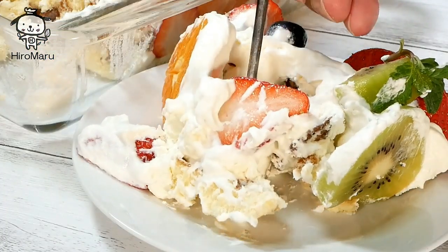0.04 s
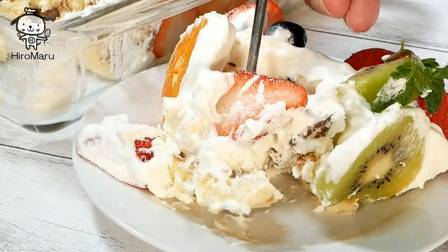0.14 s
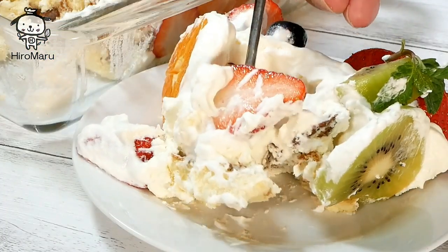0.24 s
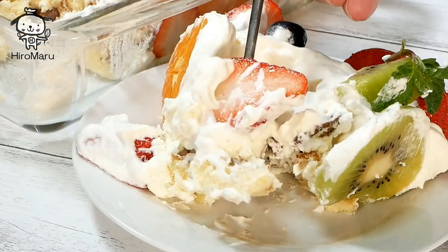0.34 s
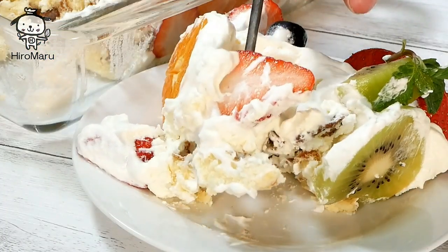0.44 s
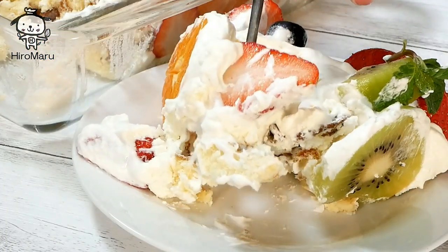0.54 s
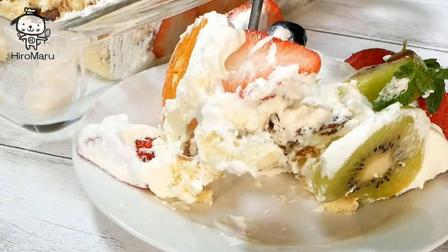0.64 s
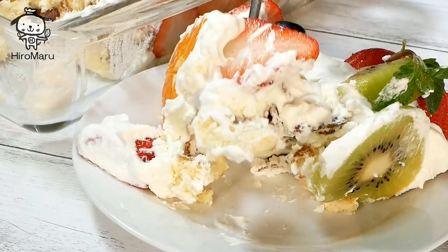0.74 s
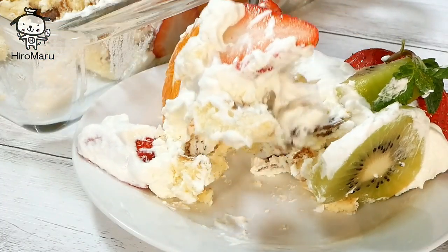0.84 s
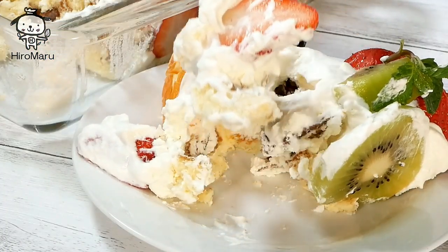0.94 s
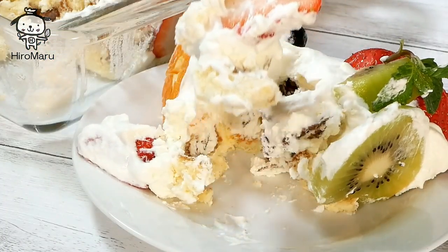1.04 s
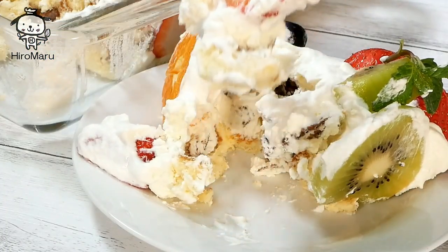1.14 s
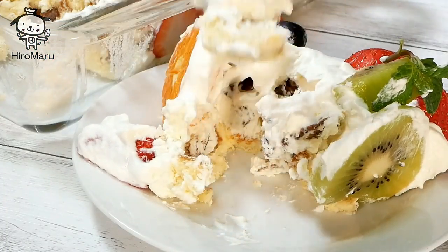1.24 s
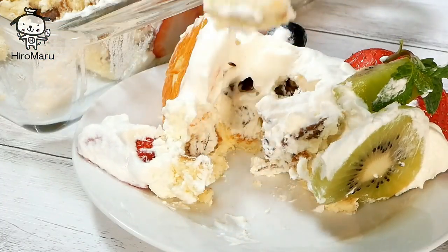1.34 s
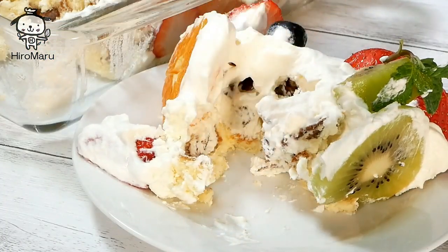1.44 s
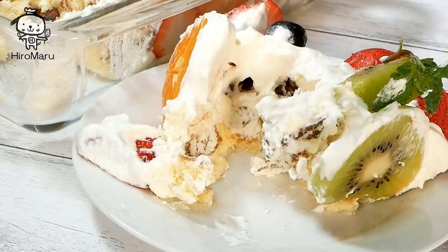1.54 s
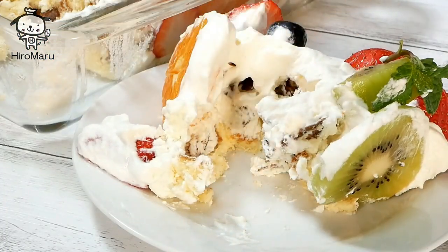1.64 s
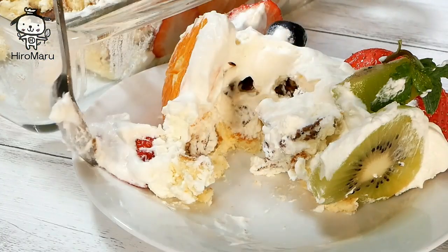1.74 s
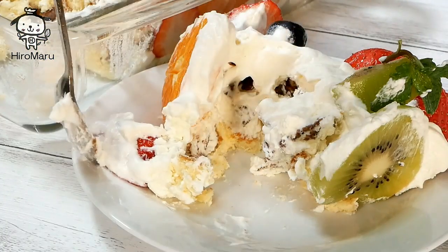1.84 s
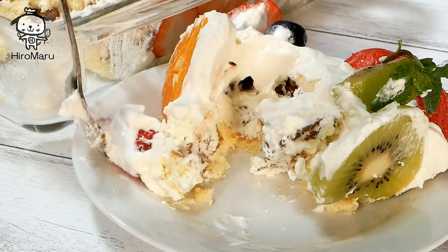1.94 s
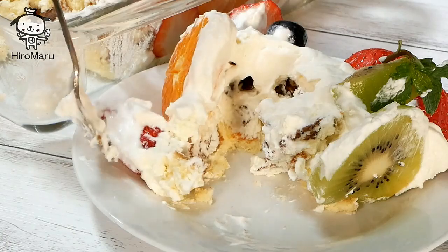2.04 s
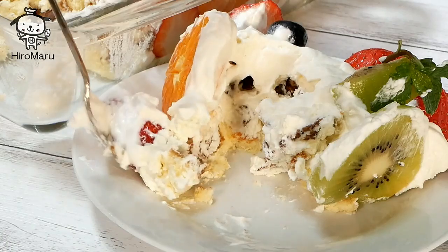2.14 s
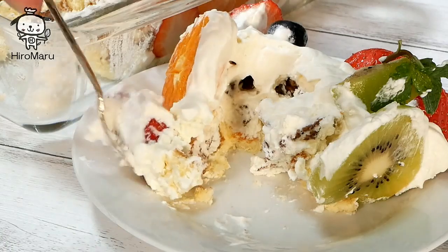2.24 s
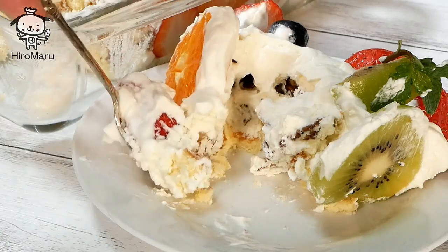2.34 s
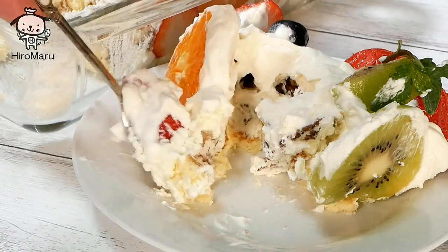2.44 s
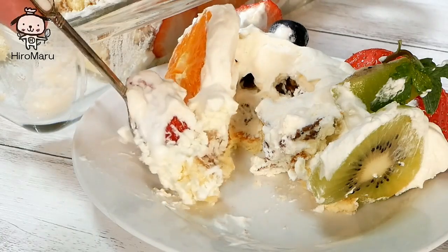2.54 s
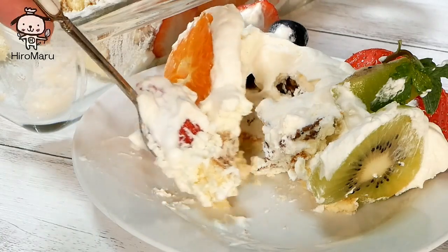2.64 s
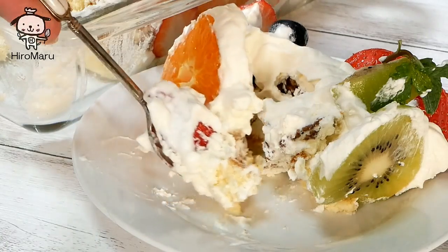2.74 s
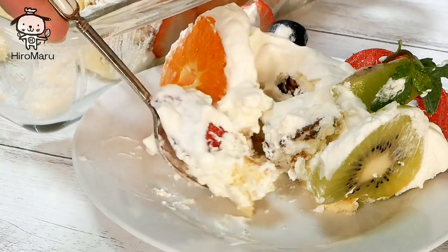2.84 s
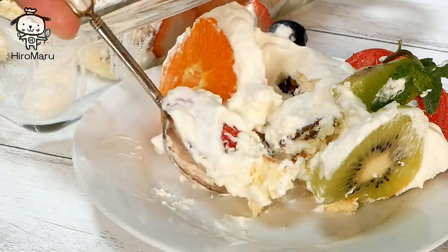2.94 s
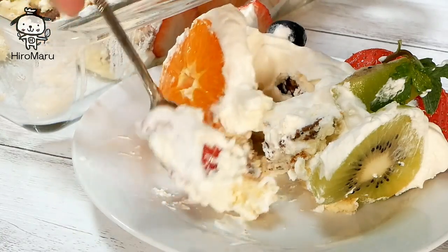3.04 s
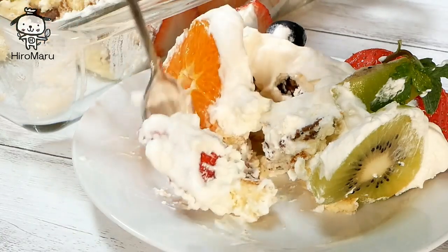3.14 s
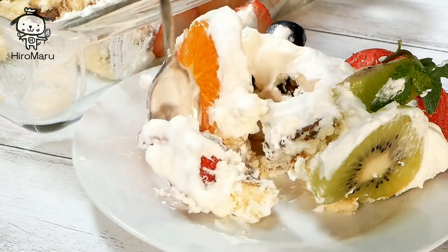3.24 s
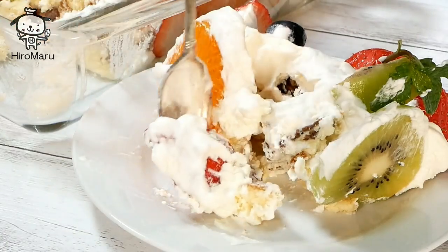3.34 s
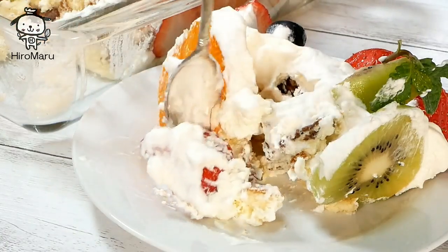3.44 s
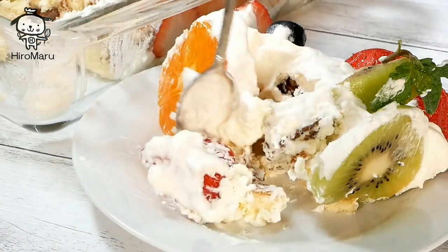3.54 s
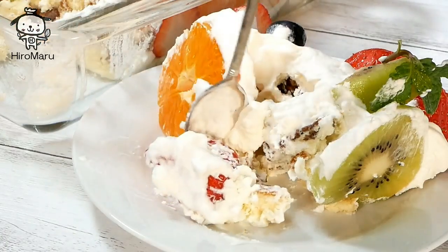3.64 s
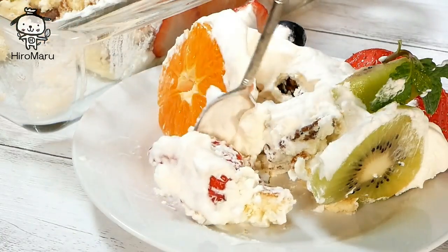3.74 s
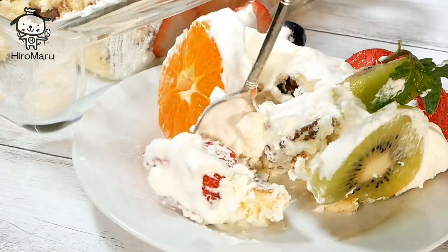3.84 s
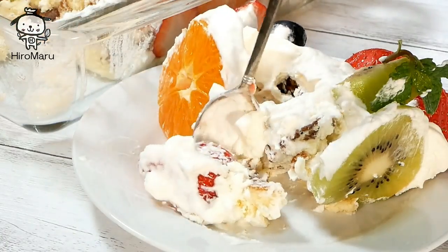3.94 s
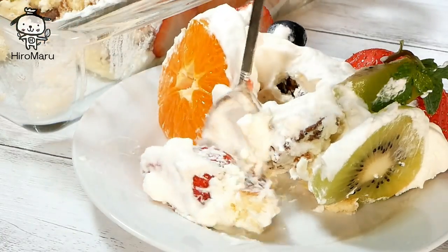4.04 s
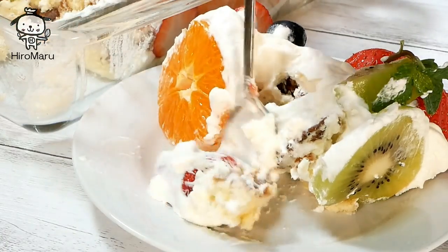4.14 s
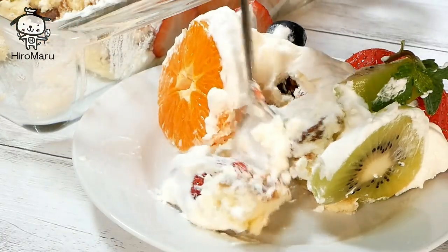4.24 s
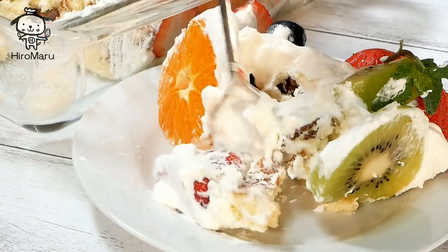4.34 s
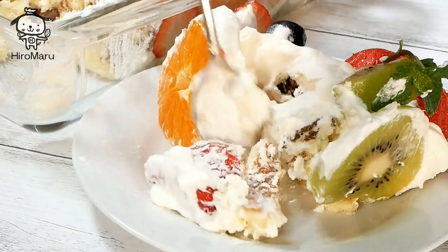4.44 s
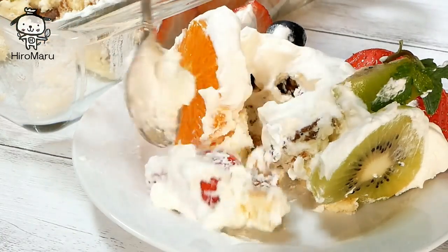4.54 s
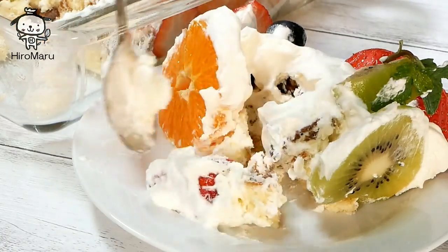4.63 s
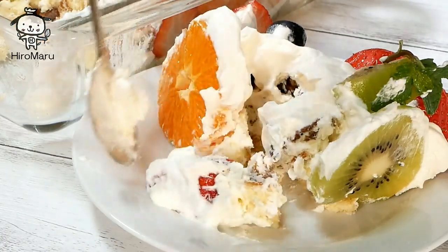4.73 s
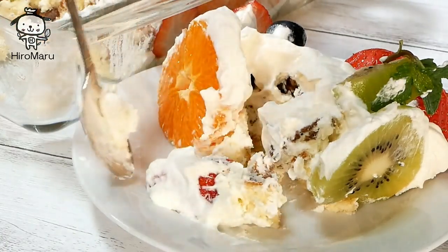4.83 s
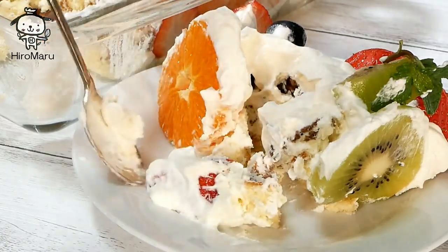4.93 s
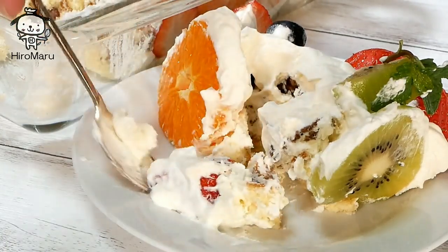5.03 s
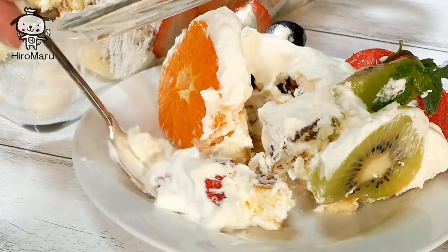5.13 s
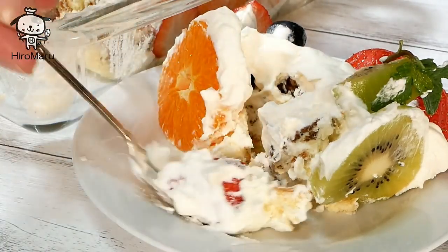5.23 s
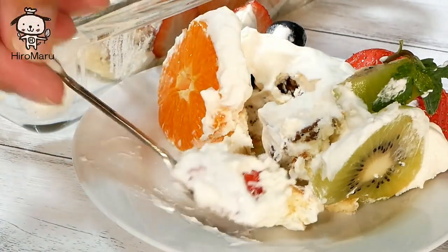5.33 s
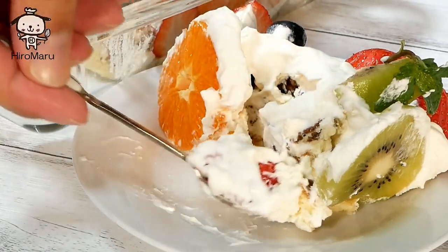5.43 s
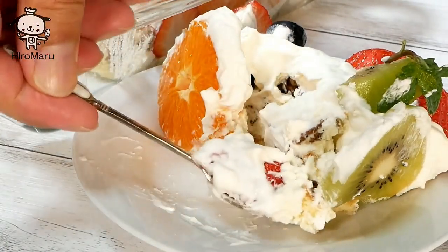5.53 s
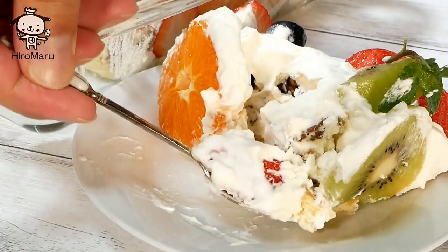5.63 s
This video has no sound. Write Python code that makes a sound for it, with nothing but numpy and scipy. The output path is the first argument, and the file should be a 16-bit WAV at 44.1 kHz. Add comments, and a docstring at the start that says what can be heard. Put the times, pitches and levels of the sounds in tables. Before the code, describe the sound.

Close view of a spoon working through soft cream cake on a ceramic plate. Faint wet ticks first, then a bright clink and short scrape near two seconds, more damped clinks and rubs, a firm tap near four seconds with a brief squeak, and two final clinks and scrapes after five. Quiet small kitchen, near microphone, low room noise and slight hiss.

```python
"""Faint wet ticks of cream come first, over a quiet kitchen; then a steel spoon clinks on the plate.
Clinks are short dying modes of a ceramic plate damped by cream cake, with a crack and a table knock.
Scrapes and rubs are random slips driving modes of spoon and plate; a brief squeak is a locked tone.
Cream is noise ticks over a fine crackle. Scatter and a short room tail answer every contact,
and low room noise with a few narrow bands, and hiss, lie beneath."""
import sys
import numpy as np
from scipy import signal
from scipy.fft import rfft, irfft
from scipy.io import wavfile
from scipy.ndimage import uniform_filter1d

SR = 44100
rng = np.random.default_rng(int(sys.argv[2]) if len(sys.argv) > 2 else 0)


def wrap_up_sound(samples):
    """Save the sound to the file named by the first command line argument, as 16-bit audio."""
    columns = np.atleast_2d(samples).T
    # keep every value between -1 and 1, then stretch to whole-number steps
    tamed = np.clip(columns, -1, 1)
    steps = np.round(tamed * 32767).astype(np.int16)
    wavfile.write(sys.argv[1], SR, steps)


N = 250488  # samples in the scene

# Where the spoon meets the plate: names in the order of the level columns below
CONTACT_SPOTS = ("rim", "side", "centre", "front")
# Modes of the loaded plate with the spoon on it, before force and dullness:
# f/Hz, t60/s, level at rim/dB, at side/dB, at centre/dB, at front/dB
PLATE_MODES = [(329, 0.016, -6.5, -10, -9, -10), (592, 0.01, -12.5, -21.5, -6, -22.5),
               (910, 0.027, -14, -27, -13.5, -22.5), (1080, 0.017, -12, -13.5, -18.5, -13.5),
               (1235, 0.013, -12, -22.5, -6, -15.5), (1900, 0.0073, -19.5, -36, -15, -51),
               (2330, 0.013, -19.5, -28, -25, -22.5), (2627, 0.034, -35, -33, -24.5, -23),
               (2810, 0.021, -24, -33, -31, -33.5), (3044, 0.0081, -16, -45, -17, -46),
               (3699, 0.015, -37, -46, -9.5, -44), (4078, 0.03, -17, -28.5, -27, -26.5),
               (4323, 0.023, -15.5, -18, -31.5, -20.5), (4467, 0.032, -18, -19, -33.5, -21),
               (4784, 0.0098, -12.5, -15.5, -30, -16.5), (5700, 0.011, -19.5, -38, -13.5, -43),
               (6100, 0.041, -15.5, -35, -19.5, -27), (6297, 0.018, -23, -26.5, -16.5, -30),
               (6790, 0.011, -16, -23.5, -43, -21.5), (7360, 0.011, -42.5, -28, -22.5, -17.5),
               (7550, 0.0073, -18, -23.5, -23.5, -19), (8050, 0.067, -24, -57, -32.5, -20),
               (8440, 0.018, -37.5, -38, -26.5, -62), (8850, 0.013, -27, -53, -23, -34),
               (10260, 0.011, -36, -41, -33.5, -40), (10910, 0.0076, -37.5, -39, -52.5, -27),
               (11680, 0.0096, -25, -30, -46.5, -63), (12310, 0.02, -38, -35, -42.5, -24.5),
               (12500, 0.023, -32.5, -41, -54.5, -34), (13517, 0.01, -38.5, -38, -35.5, -44)]
# Longer modes of the spoon and the plate's free edge, before each blow's own gains:
# f/Hz, t60/s, level at rim/dB, at side/dB, at centre/dB, at front/dB
LONG_RING_MODES = [(1311, 0.23, -52, -41.5, -48.5, -47), (2677, 0.11, -60.5, -35.5, -50.5, -37),
                   (2729, 0.13, -61.5, -38.5, -59.5, -30), (3740, 0.053, -71.5, -70, -35, -70),
                   (3530, .15, -72, -76, -44.5, -70), (4200, 0.26, -49, -59, -37.5, -47),
                   (4385, 0.18, -43.5, -57, -59, -35.5), (5980, 0.074, -38, -47, -33.5, -62),
                   (7600, 0.17, -42, -43, -53.5, -57), (8240, 0.18, -48.5, -39, -56.5, -47),
                   (12800, .12, -53.5, -41, -69, -52)]
# The wooden table under the plate, before force: f/Hz, t60/s, level/dB
TABLE_MODES = [(156.9, 0.24, -53.5), (208, 0.18, -48)]
# Blows: t/s, spot, force/dB, dullness/(dB per kHz), long ring gain/dB, crack level before force/dB
BLOWS = [ (1.801, "rim", -2, 0, -0.5, -20.5), (1.944, "rim", -25, 2, 2, -48),
         (1.963, "rim", -32.5, 0.5, 10, -22), (2.173, "side", -0.5, 0.5, 3, -29),
         (2.3230, "side", -10, 1.1, -0.5, -33.5), (2.522, "side", -27.5, 3, -16, -24),
         (2.754, "centre", -26.5, 12, -8, -47), (2.819, "centre", -31, 4, -8, -42),
         (3.054, "side", -34, -1, -10, -23), (3.7, "centre", -35.5, 3.5, -5.5, -37),
         (3.8400, "centre", -2.5, -0.5, -6.5, -33.5), (4.0269, "centre", -12, 9, -2, -37),
         (4.0485, "centre", -20.5, 4, 5, -37), (4.07, "centre", -12, 11, 1, -42),
         (4.924, "front", -2, 0, 5, -28), (5.1164, "front", -6, 1.66, 0.5, -33.5)]
# Tone of steel cracking on glaze: f/Hz, level/dB
CRACK_TONE = [(300, -4.5), (2000, 3), (6500, 2), (9000, -1.5), (12500, -2.5), (15500, -12)]
# Pushes along the glaze: t of greatest pressure/s, spot, rise/s, fall/s, level/dB,
# contact stiffness (factor on pitch, before each mode's share), cream crackle relative to the push/dB
PUSHES = [ (1.954, "rim", 0.066, 0.038, -56.5, 1.02, -11), (2.512, "side", 0.044, .04, -64, 0.88, -12),
          (2.655, "side", 0.1, 0.12, -66.5, 0.92, -6), (3.057, "side", 0.048, 0.041, -58, 0.9, -13),
          (4.110, "centre", 0.029, 0.02, -65.5, 0.79, -1), (4.231, "centre", .04, 0.022, -57.5, 0.83, 0.5),
          (4.293, "centre", .005, 0.027, -61.5, .76, -2.5),
          (4.316, "centre", 0.013, 0.0077, -58.5, 0.77, -3),
          (5.214, "front", 0.056, 0.034, -59.5, 1.03, -2), (5.305, "front", 0.098, 0.054, -55.5, 0.97, -10),
          (5.353, "front", .025, 0.029, -59, 1.1, -12)]
# Bending modes of the spoon pressed on the glaze: f/Hz, nominal width/Hz (doubled in each of two
# filter passes), level/dB, share (exponent) by which pitch follows the stiffness
PRESSED_MODES = [(1118, 84, 6, 0.21), (2554, 107, 2, 0.85), (4545, 173, 3.5, 0.3), (5980, 160, -7, 0.3),
                 (7160, 540, -8.5, 0.41), (7940, 120, -4, 0.087), (8930, 210, -7.5, 0.089),
                 (12200, 2000, -24, 0.18)]
# Stick-slip squeaks: t of firmest grip/s, rise/s, fall/s, level/dB, f at firmest grip/Hz, roughness 0-1
SQUEAK_GRIPS = [(4.139, .01, 0.026, -52.5, 1000, 0.4), (4.181, 0.023, 0.016, -47, 1037, 0.37),
                (4.222, .045, 0.024, -39.5, 969, 0), (4.292, .004, 0.038, -54, 1092, 0.9)]
# Wet ticks of cream parting, before a common size trim: t/s, level/dB
CREAM_TICKS = [(0.241, -45), (.353, -50), (.638, -49), (2.591, -41), (2.805, -47.5), (2.908, -44),
               (2.937, -47), (3.106, -40), (3.171, -45.5), (3.276, -51), (4.364, -41.5), (4.392, -45),
               (4.545, -49), (5.2216, -31.5), (5.509, -45.5), (5.624, -44)]
# Tone of ticks and crackle: f/Hz, level/dB
CREAM_TONE = [(300, -20.5), (1500, -11.5), (4000, -6.5), (6000, -3.5), (8300, 2), (10500, -7.5),
              (15500, -11)]
# The spoon sinks through cream and sponge: t of fastest cutting/s, rise/s, fall/s, level/dB
CAKE_CUTS = [(1.69, .22, 0.11, -74.5), (2.87, 0.76, 0.33, -71), (3.79, .25, .7, -68.5)]
# How long the room rings: f/Hz, t60/s
ROOM_DECAY = [(200, .38), (530, 0.36), (1390, 0.29), (3680, 0.26), (9700, 0.2), (16000, 0.088)]
# Tone of the room tail: f/Hz, level/dB
ROOM_TONE = [(150, 5.5), (330, -4), (650, 0.5), (1100, -6.5), (2500, 0.5), (4500, -4.5), (8000, -7),
             (14000, -0.5)]
# Spectral shape of still room and microphone hiss: f/Hz, relative level/(dB per Hz)
AIR_TONE = [(12, -23.5), (22, 0), (50, -0.5), (100, -4.5), (150, -4.5), (220, -7), (320, -8.5), (500, -13),
            (1000, -18), (2200, -23), (6000, -28.5), (12000, -30), (15500, -33.5)]
# Narrow bands of low noise in the room tone: f/Hz, width of each of two filter passes/Hz, level/dB
NARROW_BANDS = [(152, 8.7, -73.5), (339.3, 31, -77.5), (399.8, 6, -74.5), (798, 12, -88.5)]

RING_T = np.arange(SR // 4) / SR  # time since a blow (s)
PRESS_POWER = 1.3  # how sharply the pressure of the hand peaks
GLIDE = 0.09  # share of stiffness lost through a push
WANDER, WANDER_S = 0.035, 0.0197  # spread of the stiffness as a share; spacing of its random points (s)
RUB_DB = 3  # the bowl on the middle of the plate, relative to the push
SAG_HZ_PER_S = 900  # fall of a squeak's pitch
BREAK_ROUGH = 0.93  # roughness added as the grip lets go; the sum stops at 1
SETTLE_DB = -87.5  # faint crackle of the cake between cuts
AIR_DB = -62  # noise level before the narrow bands are added
EDGE_HZ = 15750  # top of the audible band


def clinks(crack_t60=0.02, room_db=-6.0):
    """Each blow: a brief crack of steel on glaze, the damped plate, a longer ring and a knock of the table."""
    out = np.zeros(N)
    knock = ring(*np.transpose(TABLE_MODES))
    for s, spot, force_db, dullness, ring_db, crack_db in BLOWS:
        crack = coloured(rng.standard_normal(len(RING_T)), CRACK_TONE) * decay(RING_T, crack_t60)
        plate = ring_at(PLATE_MODES, spot, dullness)
        long_ring = gain_of(ring_db) * ring_at(LONG_RING_MODES, spot, dullness)
        blow = plate + long_ring + knock + gain_of(crack_db) * crack
        add(out, s, gain_of(force_db) * in_kitchen(blow, room_db))
    return out


def scrapes(room_db=-6):
    """The dragged edge catches and slips at random; its modes sink and wander as the contact slides."""
    out = np.zeros(N)
    for s, _, rise_s, fall_s, level_db, stiffness, _ in PUSHES:
        t, pressure = press(rise_s, fall_s)
        wander = np.interp((t + rise_s) / WANDER_S, np.arange(64), rng.standard_normal(size=64))
        sliding = stiffness * (1 - GLIDE * t / (rise_s + fall_s) + WANDER * wander)
        drive = slips(len(t), per_s=900, spread_db=1.5)
        steel = np.zeros(len(t))
        for hz, width, db, share in PRESSED_MODES:
            bent_hz = hz * sliding ** share
            once = resonate(drive, bent_hz, 2 * width)
            steel += gain_of(db) * resonate(once, bent_hz, 2 * width)
        add(out, s - rise_s, evened(steel) * gain_of(level_db) * pressure)
    return in_kitchen(out, room_db)[:N]


def rub(dullness=2, room_db=-4):
    """In the middle of the plate the bowl rubs under the cake: soft slips, each a tiny dull blow."""
    drive = np.zeros(N)
    body = ring_at(PLATE_MODES, "centre", dullness)
    for s, spot, rise_s, fall_s, level_db, _, _ in PUSHES:
        if spot == "centre":
            t, pressure = press(rise_s, fall_s)
            rubbing = slips(len(t), per_s=1500, spread_db=1)
            add(drive, s - rise_s, rubbing * gain_of(level_db + RUB_DB) * pressure)
    rubbed = signal.fftconvolve(drive, body / np.linalg.norm(body))
    return in_kitchen(rubbed, room_db)[:N]


def squeak(jitter=0.092, overtone_db=-28, rough_lift_db=20, slope_db=-3, room_db=-10):
    """The slips lock onto a plate mode; as the grip breaks they turn uneven and brighter."""
    out = np.zeros(N)
    for s, rise_s, fall_s, level_db, hz, roughness in SQUEAK_GRIPS:
        t, grip = press(rise_s, fall_s)
        rough = np.minimum(roughness + BREAK_ROUGH * np.maximum(t, 0) / fall_s, 1)
        waver = evened(uniform_filter1d(rng.standard_normal(N), size=60))[:len(t)]
        pitch = (hz - SAG_HZ_PER_S * t) * (1 + jitter * rough * waver)
        angle = 2 * np.pi * np.cumsum(pitch) / SR
        overtones = sum(gain_of(slope_db * (k - 2)) * np.cos(k * angle) for k in (2, 4, 6, 8))
        tone = np.sin(angle) + gain_of(overtone_db + rough_lift_db * rough) * overtones
        # A sine times the root of 2 has rms 1
        add(out, s - rise_s, np.sqrt(2) * gain_of(level_db) * grip * tone)
    return in_kitchen(out, room_db, near_db=-28)[:N]


def cream(t60=0.0075, size_db=-7, room_db=-10):
    """Air pockets snap as cream parts: larger ticks over a fine crackle that swells with each cut and push."""
    ticks = np.zeros(N)
    for s, level_db in CREAM_TICKS:
        snap = evened(coloured(rng.standard_normal(len(RING_T)), CREAM_TONE)) * decay(RING_T, t60)
        add(ticks, s, gain_of(level_db + size_db) * snap)

    # Overlapping swells of crackle add as power
    power = np.full(N, gain_of(SETTLE_DB) ** 2)
    swells = list(CAKE_CUTS)
    for s, _, rise_s, fall_s, level_db, _, cream_db in PUSHES:
        swells.append((s, rise_s, fall_s, level_db + cream_db))
    for s, rise_s, fall_s, level_db in swells:
        _, pressure = press(rise_s, fall_s)
        add(power, s - rise_s, (gain_of(level_db) * pressure) ** 2)
    crackle = evened(coloured(slips(N, per_s=1800, spread_db=3), CREAM_TONE)) * np.sqrt(power)
    return in_kitchen(ticks + crackle, room_db, near_db=-15.0)[:N]


def in_kitchen(x, wet_db, near_db=-11, near_t60=0.036, build=0.00043):
    """Direct sound, quick scatter off the table and dishes, and the tail of the room."""
    t = np.arange(SR // 2) / SR
    # Sparse random reflections, on about one sample in eight
    present = rng.random((2, len(t))) < 1 / 8
    taps, scatter = rng.choice([-1, 1], (2, len(t))) * present
    # Each frequency band of the tail dies at its own rate
    hz, when, bands = signal.stft(taps, SR, nperseg=256)
    bands = bands * decay(when, read(ROOM_DECAY, hz)[:, None])
    tail = signal.istft(bands, SR, nperseg=256)[1][:len(t)]
    tail = tail * (1 - np.exp(-np.maximum(t - 0.007, 0) / build))  # starts after 7 ms
    scatter = scatter * (t > 0.002) * decay(t, near_t60)  # starts after 2 ms
    echo = gain_of(wet_db) * coloured(tail / np.linalg.norm(tail), ROOM_TONE)
    echo += gain_of(near_db) * scatter / np.linalg.norm(scatter)
    echo[0] += 1  # direct sound
    return signal.fftconvolve(x, echo)


def air(side_db=-23):
    """Low room noise, narrow bands and hiss as shaped random noise, almost the same in both channels."""
    mid, side = (gain_of(AIR_DB) * evened(coloured(noise, AIR_TONE)) for noise in rng.standard_normal((2, N)))
    for hz, width, db in NARROW_BANDS:
        once = resonate(rng.standard_normal(N), hz, width)
        mid = mid + gain_of(db) * evened(resonate(once, hz, width))
    return mid + gain_of(side_db) * np.array([side, -side])


def ring_at(modes, spot, dullness):
    """The spot picks the modes; cream under the spoon softens the contact and takes off treble."""
    hz, t60, *levels = np.transpose(modes)
    khz = hz / 1000
    return ring(hz, t60, levels[CONTACT_SPOTS.index(spot)] - dullness * khz)


def ring(hz, t60, db):
    """Dying modes; neighbours swing in opposite senses and each builds up with a two-cycle time constant."""
    signs = (-1) ** np.arange(len(hz))
    cycles = hz[:, None] * RING_T
    swings = np.sin(2 * np.pi * cycles) * (1 - np.exp(-cycles / 2))
    return (signs * gain_of(db)) @ (swings * decay(RING_T, t60[:, None]))


def press(rise_s, fall_s):
    """The hand bears down and lets go: time from the peak (s) and pressure 0-1."""
    t = np.arange(-rise_s, fall_s, 1 / SR)
    ramp = np.interp(t, [-rise_s, 0, fall_s], [0, 1, 0])
    return t, np.sin(np.pi / 2 * ramp) ** PRESS_POWER


def slips(size, per_s, spread_db):
    """Random tiny impulses of uneven strength and either sign, scaled to rms 1."""
    lift_db = spread_db * np.minimum(rng.exponential(1, N), 3)
    strengths = gain_of(lift_db) * rng.choice([-1, 1], N)
    happens = rng.random(N) < per_s / SR
    return evened((strengths * happens)[:size])


def resonate(x, hz, width):
    """A resonance of gain 1 that follows the curve hz: shift it down to 0 Hz, smooth, shift back."""
    turn = np.exp(2j * np.pi * np.cumsum(hz * np.ones(len(x))) / SR)
    r = np.exp(-np.pi * abs(width) / SR)
    return 2 * (turn * signal.lfilter([1 - r], [1, -r], x / turn)).real


def decay(t, t60):
    """Exponential fade that loses 60 dB in t60 seconds."""
    return np.exp(-np.log(1000) * t / t60)


def coloured(x, points):
    """Filters by a table of f/Hz, level/dB."""
    hz = np.fft.rfftfreq(len(x), 1 / SR)
    return irfft(rfft(x) * gain_of(read(points, hz)), len(x))


def read(points, hz):
    """Reads a spectrum table on a log-frequency axis."""
    f, value = np.transpose(points)
    return np.interp(np.log(hz + 1), np.log(f), value)  # + 1 keeps the log finite at 0 Hz


def gain_of(db):
    """Decibels to amplitude."""
    return 10 ** (np.asarray(db) / 20)


def evened(x):
    """Scales to rms 1."""
    return x / np.sqrt(np.mean(x ** 2) + 1e-20)


def add(mix, s, sound):
    """Mixes a sound in at time s, cut off at the end of the mix."""
    part = mix[max(round(s * SR), 0):][:len(sound)]
    part += sound[:len(part)]


def scene(side_db=-33):
    """Spoon, plate and cake sit in the middle, over the air of the room."""
    near = clinks() + scrapes() + rub() + squeak() + cream()
    # A faint noisy smear of the sound, opposite in the two channels
    smear = rng.standard_normal(256)
    side = gain_of(side_db) * signal.fftconvolve(near, smear / np.linalg.norm(smear))[:N]
    return near + np.array([side, -side]) + air()


def record(dry):
    """The band limit of the recorder: a steep low-pass."""
    low_pass = signal.firwin(255, EDGE_HZ, window=("kaiser", 9), fs=SR)
    return signal.oaconvolve(dry, low_pass[None], "same")


dry = scene()
out = record(dry)
wrap_up_sound(out)
```